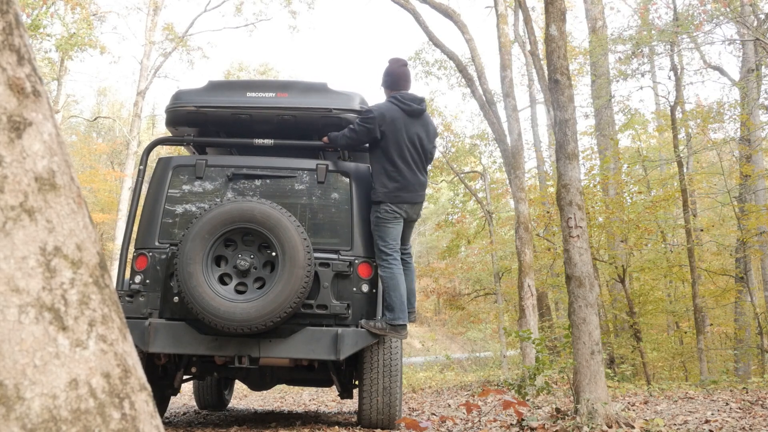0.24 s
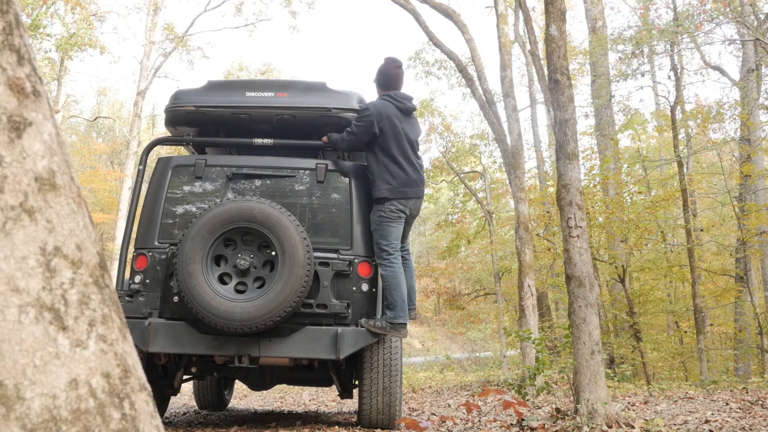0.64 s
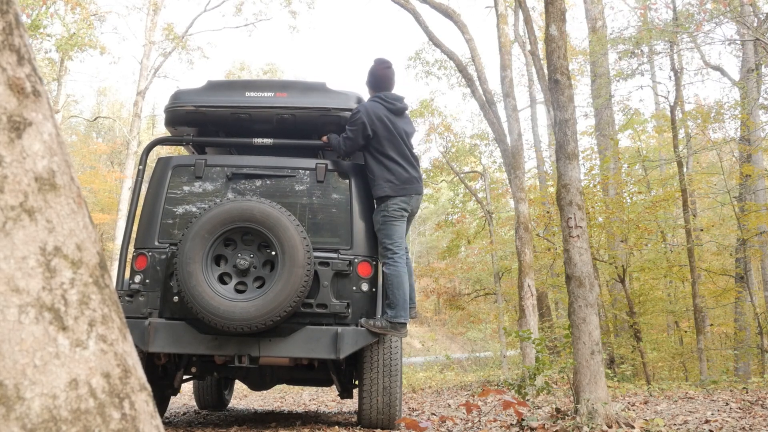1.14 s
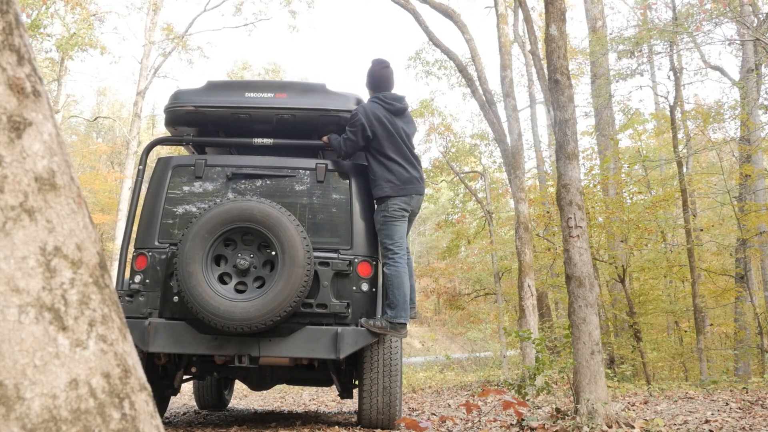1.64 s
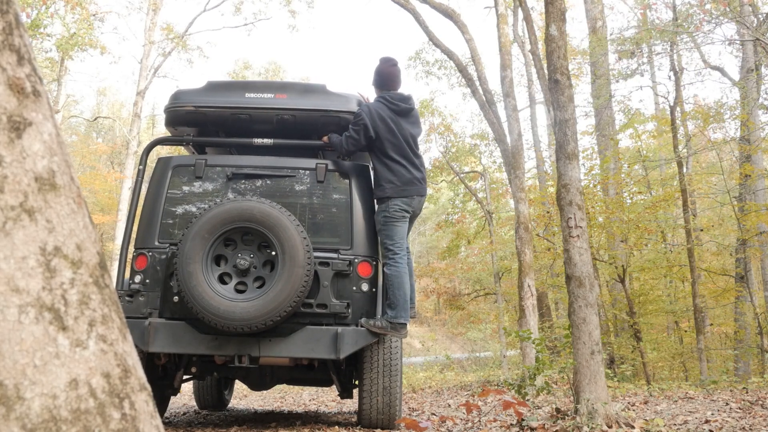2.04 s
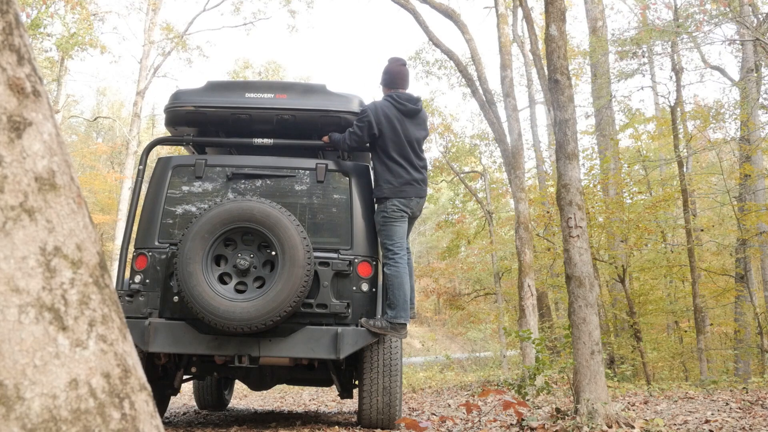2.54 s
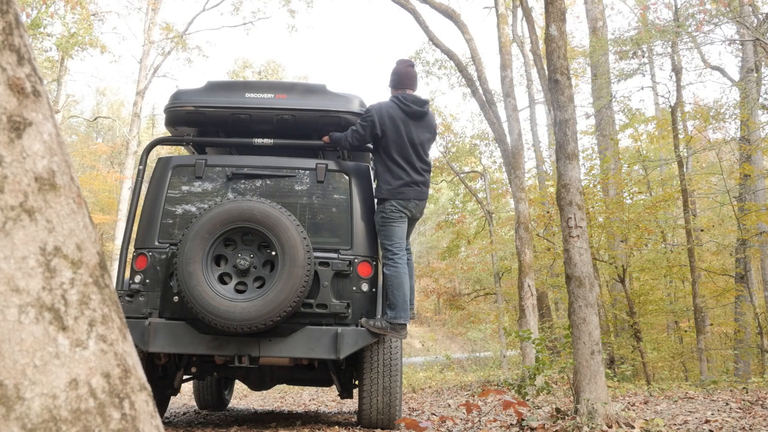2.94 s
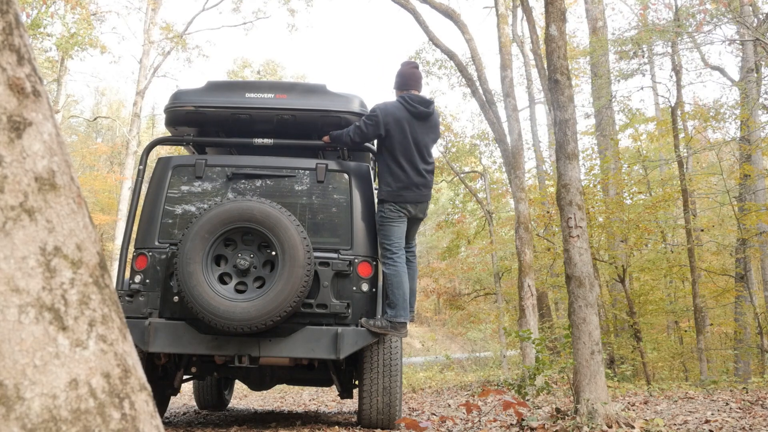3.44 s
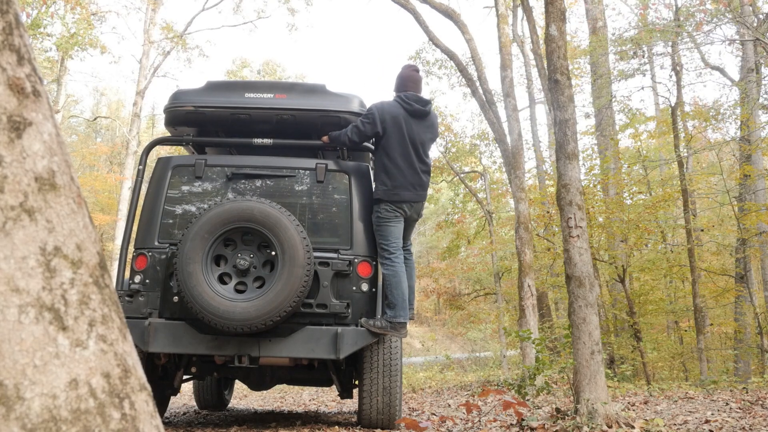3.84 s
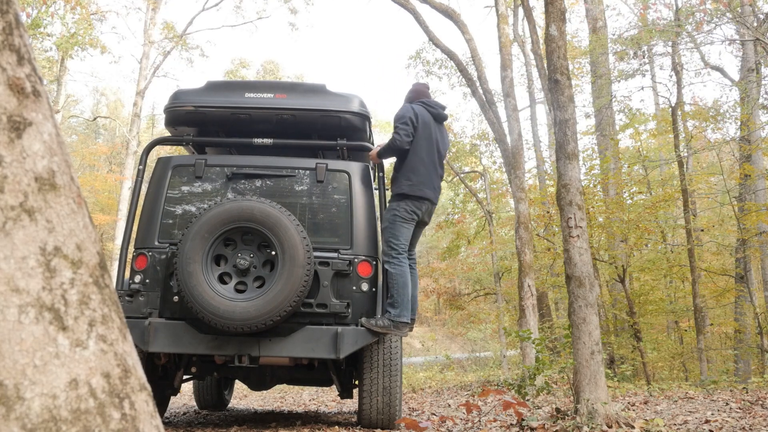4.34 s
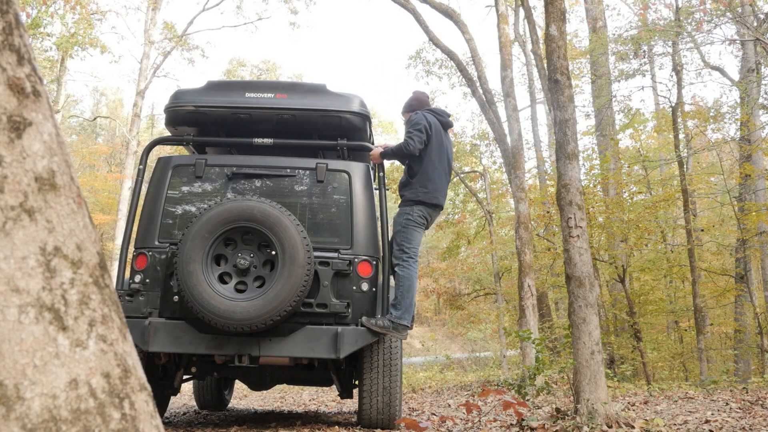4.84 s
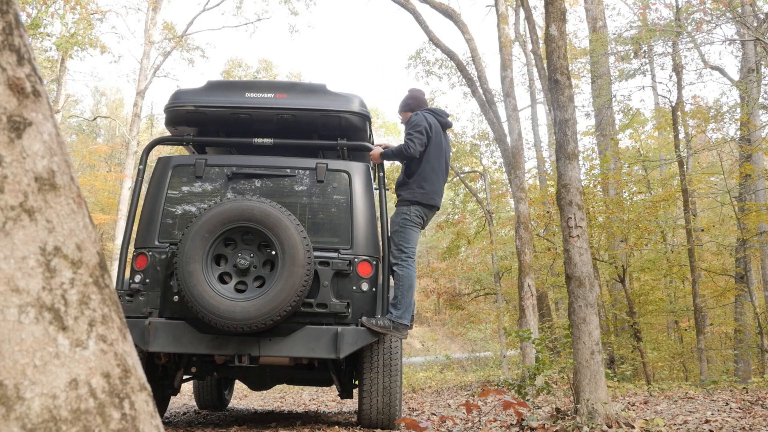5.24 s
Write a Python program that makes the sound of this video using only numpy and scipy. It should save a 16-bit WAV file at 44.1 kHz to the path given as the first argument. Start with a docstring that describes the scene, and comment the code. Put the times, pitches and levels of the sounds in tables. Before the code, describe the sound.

A hard plastic lid on a car roof rubs, bumps, creaks briefly and is knocked shut with a metallic latch snap, in quiet leafy woods.

```python
"""The hard plastic lid of a roof tent, on a car in a wood, is shut: it rubs, bumps, creaks and is knocked home.
Each contact excites damped shell modes, dense panel ringing and a local note, dispersed as bending waves.
A latch hook drags over its keeper through random catches and snaps over with metallic clicks.
Trees return a faint diffuse echo; shaped noise gives the hiss of leaves, a far bird's whistles and
a low rumble of air."""
import sys
import numpy as np
from scipy import signal
from scipy.fft import rfft, irfft
from scipy.io import wavfile

SR = 44100
rng = np.random.default_rng(int(sys.argv[2]) if len(sys.argv) > 2 else 0)


def master_out(mix):
    """Clip the mix to full scale and print it as 16-bit PCM to the path in sys.argv[1]."""
    frames = np.transpose(np.atleast_2d(mix))
    ceiling = np.clip(frames, -1, 1)
    pcm = np.round(ceiling * 32767).astype(np.int16)
    wavfile.write(sys.argv[1], SR, pcm)


N = 242275  # length of the scene in samples
RING = np.arange(16384) / SR  # time axis of one impact response, s

# Blows pressing the lid home: t/s, level/dB, contact cutoff f/Hz, box boom/dB, note of struck spot f/Hz,
# note level/dB, lead of the rim's first touch t/s, note of the settling thud f/Hz
SEATINGS = [(1.9154, -18, 2200, -8, 1267, -5.5, .002, 472), (2.4665, -25.5, 2500, 0, 1403, -7, .0055, 89.3),
            (2.7597, -20, 2530, 3.5, 1746, 1.5, .0024, 110)]
# Hands bumping the loose lid: t/s, level/dB, contact cutoff f/Hz, box boom/dB, note of struck spot f/Hz,
# interval between rocks t/s, level change per rock/dB
BUMPS = [(.980, -37.5, 480, -8, 270, .021, -5), (1.153, -30, 1000, -10, 497, .0098, -4.5),
         (1.1813, -26, 2370, -9, 383, .031, -17), (1.364, -33.5, 700, 1, 178, .024, -14),
         (1.645, -33.5, 620, 7, 121, .022, -6.5), (1.696, -32, 1200, 1.5, 120, 0.025, -5.5),
         (1.833, -37, 1100, 6, 139, .0235, -0.5), (3.154, -43, 300, 11, 156, .024, -10),
         (3.458, -43.5, 900, -5, 674, .024, -10)]
# Damped modes of the shell: f/Hz, relative energy level/dB, T60/s
SHELL_MODES = [(92.5, -12.5, 0.089), (120.3, -5.5, 0.48), (172, -4.5, 0.12), (196.6, 0, 0.26),
               (243.5, -1.5, 0.14), (349.3, -5, 0.3), (395, -1.5, 0.17), (474.3, 1.5, 0.36),
               (579, -5, 0.23), (699, -3.5, 0.093), (730, -7, 0.053), (777, -8, 0.17), (909, -4.5, 0.19),
               (945, -3, 0.21), (1045, -0.5, 0.05), (1091, 1.5, 0.055), (1220, -4, 0.037),
               (1420, -15, 0.024), (1634, 1, 0.053), (1720, 3, 0.029), (1680, -8, 0.037), (2318, 5, 0.12),
               (2452, 3, 0.034), (2910, -13, 0.034), (3476, 3, 0.086), (4530, -38, .03)]
# Decay of the many weak panel modes: f/Hz, T60/s
PANEL_T60 = [(100, 0.57), (300, 0.28), (700, 0.16), (1500, 0.083), (4000, 0.058), (12000, 0.052)]
# Spectral colour of a knock: f/Hz, level/dB
KNOCK_COLOUR = [(35, -17), (80, -2), (150, 2), (290, -3), (380, 1.5), (560, 0), (750, 3), (1700, 0),
                (2200, -2), (4600, 0), (6000, -2.5), (7500, -13), (14000, -2)]
# Spectral colour of a slip of the rim: f/Hz, level/dB
SLIP_COLOUR = [(50, -22), (120, -15), (300, -4), (500, -2.5), (950, 5.5), (1500, 5), (2000, -3.5),
               (3400, 1), (4400, -0.5), (5900, -4), (7300, -11.5), (14000, -12.5)]
# Clicks of the latch: t/s, level/dB, contact cutoff f/Hz
LATCH_CLICKS = [(.988, -44.5, 9000), (0.9997, -45, 9000), (1.8984, -28, 7000), (1.916, -17, 7140),
                (1.947, -34, 8050)]
# Damped modes of the latch: f/Hz, relative energy level/dB, T60/s
LATCH_MODES = [(1820, 6, 0.02), (2108, 7, 0.027), (2510, -7, 0.042), (2520, -19, .025), (3180, 0.5, 0.016),
               (3610, -4, 0.02), (4370, -3, 0.013), (5030, -3.5, 0.011)]
# Decay of the latch's metal fittings: f/Hz, T60/s
FITTINGS_T60 = [(300, 0.055), (1500, 0.15), (4000, 0.052), (8000, 0.097), (13000, 0.27)]
# Spectral colour of the latch: f/Hz, level/dB
LATCH_COLOUR = [(60, -42), (400, 2), (1200, 1), (1600, -1.5), (3300, 7.5), (4400, 4), (6000, 0),
                (7500, -6.5), (12500, -9.5), (16000, -22)]
# Decay of the echo of the wood: f/Hz, T60/s
WOOD_T60 = [(100, 0.9), (400, 1), (900, 1.34), (3000, 0.82), (7000, 0.46), (14000, 0.48)]
# Spectral colour of that echo: f/Hz, level/dB
WOOD_COLOUR = [(80, -16), (200, 1.5), (550, -8.5), (920, -1.5), (1400, -7), (3000, -1.5), (8000, 6),
               (14000, 7.5)]
# Notes of a far bird: t/s, duration/s, f/Hz, level/dB
BIRD_NOTES = [(0.187, .15, 3400, -60), (0.226, 0.1, 2670, -55.5)]
# Relative spectral density of the leaf hiss: f/Hz, level/dB
HISS_COLOUR = [(25, -19), (100, -4.5), (250, -2), (550, -1), (760, 2.5), (930, 6), (1150, -1), (1700, -2),
               (2700, -0.5), (3450, 1.5), (4100, -4), (5100, -5.5), (7000, -13.5), (15000, -30)]
# Level of the air rumble, before RUMBLE_GAIN_DB: t/s, level/dB
RUMBLE_LEVEL = [(2.6, -67), (2.83, -56), (3.85, -53.5), (3.9, -59.5), (4.93, -53.5), (5.46, -58),
                (5.49, -56)]
# Relative spectrum of the rumble: f/Hz, level/dB
RUMBLE_COLOUR = [(10, -26), (24, -9), (36, 2), (55, -10), (90, -17), (180, -25.5), (400, -81)]
# Relative spectrum of the faint noise that differs between left and right: f/Hz, level/dB
SIDE_COLOUR = [(30, -1), (100, 0), (250, 7.5), (600, 8), (1200, 3), (4000, -5), (14000, -19.5)]

# Seating: the rim touches light and hard, the lid strikes and rebounds softer and lower in note
TOUCH_DB, TOUCH_HZ = -7, 5800
REBOUND_S, REBOUND_DB, REBOUND_RATIO, REBOUND_NOTE_DB = 0.00312, -7, .4, 1.5
# Then its full weight settles on the box and booms more than the strike
SETTLE_S, SETTLE_DB, SETTLE_HARD_HZ, SETTLE_NOTE_DB, SETTLE_BOOM_DB = 0.00977, -8.5, 600, -7, 6
# Bumps: each rock keeps a share of the contact cutoff; below REST_DB the lid is at rest
BUMP_NOTE_DB, ROCK_SOFTENING, REST_DB = -7.5, 0.97, -46
# Creak: start and gaps between slips; the excess over the last gap shrinks by GAP_KEPT each time
CREAK_S, FIRST_GAP_S, LAST_GAP_S, GAP_KEPT = 1.2669, .0112, .00505, .72
# Level and contact cutoff at the ends and at the top of the arch of force
CREAK_ENDS_DB, CREAK_TOP_DB, CREAK_ENDS_HZ, CREAK_TOP_HZ, CREAK_SKEW = -23.5, -21.3, 2630, 3860, 1.5
# The rubbed spot's note climbs and strengthens along the stroke
CREAK_FROM_HZ, CREAK_TO_HZ, CREAK_FROM_DB, CREAK_TO_DB = 790, 1080, -11, -0.5
# A high overtone of that note squeals where the force is greatest
SQUEAL_RATIO, SQUEAL_ENDS_DB, SQUEAL_TOP_DB = 4.33, -36, -5
# Rub: a rounded swell of slips; the level drop is RUB_RANGE_DB at the rise or fall time from the top
RUB_TOP_S, RUB_GAP_S, RUB_RISE_S, RUB_FALL_S = 0.94, .0066, 0.02, 0.027
RUB_DB, RUB_RANGE_DB, RUB_ROUNDNESS = -25.5, 16.5, 1.15
# At the top of the swell; cutoff and note fall one octave per RUB_DB_PER_OCTAVE of level drop
RUB_HARD_HZ, RUB_NOTE_HZ, RUB_NOTE_DB, RUB_DB_PER_OCTAVE = 1640, 745, -9, 15.5
# Drag of the latch hook, from DRAG_DB upwards by the tightening
DRAG_S, DRAG_LENGTH_S, DRAG_ATTACK_S, DRAG_RELEASE_S = 1.897, .0172, 0.0013, .001
DRAG_DB, DRAG_TIGHTENING_DB = -20.5, 5
# Air: rms level of the hiss; rumble level ahead of its table, before the gain, and the gain itself
HISS_DB, RUMBLE_CALM_DB, RUMBLE_GAIN_DB = -47, -73, 0.5
EDGE_HZ = 15600  # upper band edge of the output


def seatings():
    """Successive impact: the rim touches, the lid strikes, rebounds once and settles with a thud."""
    out, ring = np.zeros(N), ringing(SHELL_MODES)
    for s, db, hard_hz, boom_db, note_hz, note_db, lead_s, thud_hz in SEATINGS:
        touch = knock(ring, db + TOUCH_DB, TOUCH_HZ, boom_db, note_hz, -np.inf)
        strike = knock(ring, db, hard_hz, boom_db, note_hz, note_db)
        rebound = knock(ring, db + REBOUND_DB, hard_hz * REBOUND_RATIO, boom_db,
                        note_hz * REBOUND_RATIO, REBOUND_NOTE_DB)
        settle = knock(ring, db + SETTLE_DB, SETTLE_HARD_HZ, boom_db + SETTLE_BOOM_DB,
                       thud_hz, SETTLE_NOTE_DB)
        add(out, s - lead_s, touch)
        add(out, s, strike)
        add(out, s + REBOUND_S, rebound)
        add(out, s + SETTLE_S, settle)
    return out


def bumps(count=3):
    """Dissipative rocking: after each bump the loose lid rocks weaker and softer until it rests."""
    out, ring = np.zeros(N), ringing(SHELL_MODES)
    for s, db, hard_hz, boom_db, note_hz, rock_s, rock_db in BUMPS:
        for k in range(count):
            level_db = db + k * rock_db
            if level_db > REST_DB:
                softened_hz = hard_hz * ROCK_SOFTENING ** k
                add(out, s + k * rock_s, knock(ring, level_db, softened_hz, boom_db, note_hz, BUMP_NOTE_DB))
    return out


def creak(count=11):
    """Stick-slip friction: the rim slips along one edge, quickening under an arch of force."""
    out, ring, s = np.zeros(N), ringing(SHELL_MODES), CREAK_S
    for k, along in enumerate(np.linspace(0, 1, count)):
        force = np.sin(np.pi * along ** CREAK_SKEW)
        level_db = between(CREAK_ENDS_DB, CREAK_TOP_DB, force)
        hard_hz = between(CREAK_ENDS_HZ, CREAK_TOP_HZ, force)
        note_hz = between(CREAK_FROM_HZ, CREAK_TO_HZ, along)
        note_db = between(CREAK_FROM_DB, CREAK_TO_DB, along)
        squeal_db = between(SQUEAL_ENDS_DB, SQUEAL_TOP_DB, force)
        add(out, s, slip(ring, level_db, hard_hz, note_hz, note_db, squeal_db))
        s += between(LAST_GAP_S, FIRST_GAP_S, GAP_KEPT ** k)
    return out


def rub(count=4):
    """Light stick-slip friction: a swell of slips, harder and higher the stronger they are."""
    out, ring = np.zeros(N), ringing(SHELL_MODES)
    for t in np.arange(-count, count) * RUB_GAP_S:
        distance = max(-t / RUB_RISE_S, t / RUB_FALL_S)
        drop_db = RUB_RANGE_DB * distance ** RUB_ROUNDNESS
        softening = 2 ** (-drop_db / RUB_DB_PER_OCTAVE)
        add(out, RUB_TOP_S + t, slip(ring, RUB_DB - drop_db, RUB_HARD_HZ * softening,
                                     RUB_NOTE_HZ * softening, RUB_NOTE_DB))
    return out


def knock(ring, db, hard_hz, boom_db, note_hz, note_db):
    """Impact excitation: one blow rings the shell, with a note set by the struck spot."""
    shell = body(ring, modes_db=-4.5, panel_db=4.5, t60=PANEL_T60)
    shell = shell + spot(note_hz, note_db, cycles=45)
    shell = shell + crumble(db=2.5, t60=0.01)
    return blow(bend(shell, lag_s=0.000694), KNOCK_COLOUR, db, hard_hz, boom_db)


def slip(ring, db, hard_hz, note_hz, note_db, squeal_db=-np.inf):
    """Friction release: one slip of the rim rings the shell, the rubbed spot and its high overtone."""
    shell = body(ring, modes_db=-6.0, panel_db=3.0, t60=PANEL_T60)
    shell = shell + spot(note_hz, note_db, cycles=12)
    shell = shell + crumble(db=0, t60=.012)
    shell = shell + spot(note_hz * SQUEAL_RATIO, squeal_db, cycles=25)
    return blow(bend(shell, lag_s=0.001014), SLIP_COLOUR, db, hard_hz)


def spot(hz, db, cycles=15):
    """Local resonance: the touched patch adds a note whose T60 is a fixed number of cycles."""
    return amp(db) * ringing([(hz, 0, cycles / hz)])


def crumble(db, t60):
    """Asperity contact: tiny catches of rough plastic form a decaying noise burst."""
    burst = rng.standard_normal(len(RING)) * np.exp(-np.log(1000) * RING / t60)
    return amp(db) * burst / np.linalg.norm(burst)


def body(ring, modes_db, panel_db, t60):
    """Impulse response: the direct crack, the ring of clear modes and a dense ring of weak ones."""
    panel = dying(t60, size=len(RING))
    return signal.unit_impulse(len(RING)) + amp(modes_db) * ring + amp(panel_db) * panel


def ringing(modes):
    """Modal superposition: damped sines of alternating sign, as heard off the struck point; energy 1."""
    out = np.zeros(len(RING))
    for k, (hz, db, t60) in enumerate(modes):
        decay = np.exp(-np.log(1000) * RING / t60)
        strength = (-1) ** k * amp(db) / np.sqrt(t60)  # db sets energy, whatever the decay
        out += strength * decay * np.sin(2 * np.pi * hz * RING)
    return out / np.linalg.norm(out)


def bend(x, lag_s):
    """Bending-wave dispersion: 1 kHz arrives lag_s late, the treble earlier, the bass later still."""
    hz = np.fft.rfftfreq(len(x), 1 / SR)
    phase = -4 * np.pi * lag_s * np.sqrt(1000 * hz)
    return irfft(rfft(x) * np.exp(1j * phase), len(x))


def blow(response, colour, db, hard_hz, boom_db=0, box_hz=230):
    """Contact stiffness: a soft contact loses treble, a heavy one booms; level is rms over 10 ms."""
    def gain_db(hz):
        treble_loss = 10 * np.log10(1 + (hz / hard_hz) ** 4)
        boom = boom_db / (1 + (hz / box_hz) ** 4)
        return read(colour, hz) - treble_loss + boom

    out = causal(response, gain_db)
    out = out * np.cos(np.pi / 2 * RING / RING[-1]) ** 2  # the ring fades to silence
    return amp(db) * np.sqrt(SR / 100) * out / np.linalg.norm(out)


def latch(catches_per_s=5000, grit_db=-8, shell_db=-8):
    """Random impact friction: tiny catches ring the dragged hook and the shell; clicks mark the metal."""
    catches = rng.choice([-1., 1.], N) * (rng.random(N) < catches_per_s / SR)
    grit = amp(grit_db) * signal.unit_impulse(len(RING))
    hook = ringing(LATCH_MODES) + amp(shell_db) * ringing(SHELL_MODES) + grit
    hook = causal(hook, lambda hz: read(LATCH_COLOUR, hz))
    out = unit(signal.oaconvolve(catches, hook)[:N]) * drag()
    for s, db, hard_hz in LATCH_CLICKS:
        metal = body(ringing(LATCH_MODES), modes_db=-10, panel_db=3, t60=FITTINGS_T60)
        add(out, s, blow(bend(metal, lag_s=.00008), LATCH_COLOUR, db, hard_hz))
    return out


def drag():
    """Friction under rising load: quick attack, steady tightening, sudden release."""
    t = np.arange(N) / SR - DRAG_S
    attack = np.clip(t / DRAG_ATTACK_S, 0, 1)
    release = np.exp(-np.maximum(t - DRAG_LENGTH_S, 0) / DRAG_RELEASE_S)
    tightening_db = DRAG_TIGHTENING_DB * np.clip(t / DRAG_LENGTH_S, 0, 1)
    return attack * release * amp(DRAG_DB + tightening_db)


def wood(x, build_s=0.0025):
    """Diffuse scattering: trunks return the sound, thinly at first."""
    build_up = 1 - np.exp(-np.arange(SR) / SR / build_s)
    tail = dying(WOOD_T60, size=SR) * build_up
    return signal.fftconvolve(x, causal(tail, lambda hz: read(WOOD_COLOUR, hz)))[:N]


def bird(blur_hz=60):
    """Narrow-band noise: thin whistles, blurred in pitch on their way through the trees."""
    out = np.zeros(N)
    for s, length, hz, db in BIRD_NOTES:
        whistle = noise([(hz - 3 * blur_hz, -70), (hz - blur_hz, -5), (hz, 0),
                         (hz + blur_hz, -5), (hz + 3 * blur_hz, -70)])
        window = np.hanning(round(length * SR))
        add(out, s, amp(db) * unit(window * whistle[:len(window)]))
    return out


def air(swell_db=-0.03):
    """Broadband noise: far leaves hiss almost evenly; a low rumble comes and goes."""
    t = np.arange(N) / SR
    swell = np.zeros(N)
    for f in np.geomspace(.3, 8, 16):
        swell += np.sin(2 * np.pi * (f * t + rng.random())) / np.sqrt(f)
    hiss = noise(HISS_COLOUR) * amp(HISS_DB + swell_db * unit(swell))
    rumble_db = np.interp(t, *np.transpose(RUMBLE_LEVEL), left=RUMBLE_CALM_DB)
    return hiss + noise(RUMBLE_COLOUR) * amp(RUMBLE_GAIN_DB + rumble_db)


def noise(colour):
    """Spectral shaping: steady random noise of a given spectrum, rms 1."""
    gain = amp(read(colour, np.fft.rfftfreq(N, 1 / SR)))
    return unit(irfft(rfft(rng.standard_normal(N)) * gain, N))


def dying(t60, size):
    """Statistical reverberation: dense random ringing, each band with its own decay; energy 1."""
    hz, t = np.fft.rfftfreq(size, 1 / SR), np.arange(size) / SR
    spectrum = rfft(rng.choice([-1., 1.], size))
    centres, times = np.transpose(t60)
    out = np.zeros(size)
    for share, time in zip(np.eye(len(t60)), times):
        band = read(np.c_[centres, share], hz)  # overlapping bands that add up to 1
        out += irfft(spectrum * band, size) * np.exp(-np.log(1000) * t / time)
    return out / np.linalg.norm(out)


def causal(x, db_at):
    """Minimum phase: filters with the gain db_at(Hz) so that nothing sounds before the blow."""
    hz = abs(np.fft.fftfreq(len(x), 1 / SR))
    log_gain = np.log(amp(np.maximum(db_at(hz), -100)))
    response = np.exp(np.conj(signal.hilbert(log_gain)))
    return np.fft.ifft(np.fft.fft(x) * response).real


def read(points, hz):
    """Logarithmic frequency scale: interpolates a spectrum along it."""
    f, value = np.transpose(points)
    return np.interp(np.log(hz + 1), np.log(f + 1), value)


def amp(db):
    """Level definition: decibels to amplitude gain."""
    return 10 ** (np.asarray(db) / 20)


def unit(x):
    """Root mean square: scales to rms 1."""
    return x / np.sqrt(np.mean(x ** 2) + 1e-20)


def between(a, b, share):
    """Linear interpolation: goes from a to b as share goes from 0 to 1."""
    return a + (b - a) * share


def add(mix, s, sound):
    """Superposition: adds a sound to the mix at time s."""
    part = mix[round(s * SR):][:len(sound)]
    part += sound[:len(part)]


def scene():
    """Mid-side superposition: all sources sit in the middle; only a faint noise differs between left and right."""
    tent = seatings() + bumps() + creak() + rub() + latch()
    mid = tent + amp(-14) * wood(tent) + bird() + air()
    side = amp(-62) * noise(SIDE_COLOUR)
    return np.array([mid + side, mid - side])


def record(dry):
    """Saturation and band limiting: clips just under full scale, then low-passes."""
    clipped = np.clip(dry, -.92, .92)
    low_pass = signal.firwin(255, EDGE_HZ, window=("kaiser", 9), fs=SR)
    return signal.oaconvolve(clipped, low_pass[None], "same")


dry = scene()
out = record(dry)
master_out(out)
```